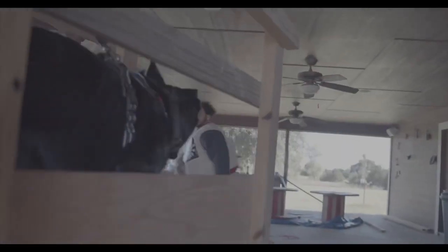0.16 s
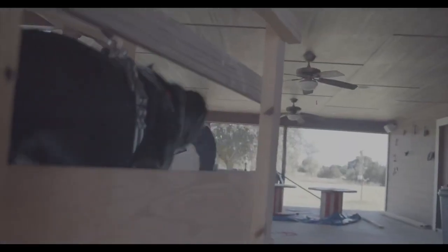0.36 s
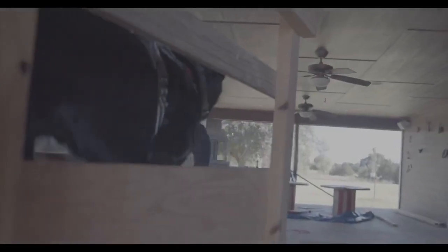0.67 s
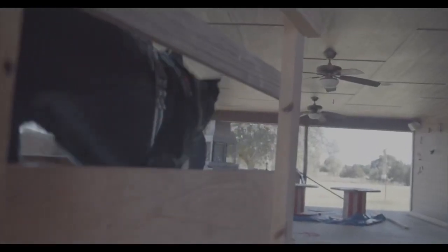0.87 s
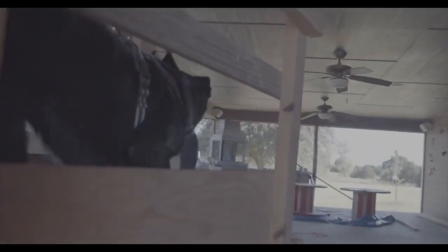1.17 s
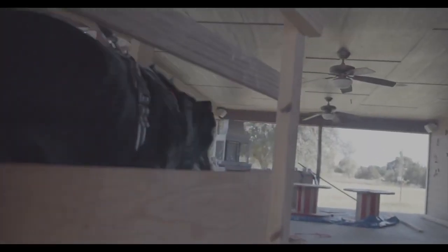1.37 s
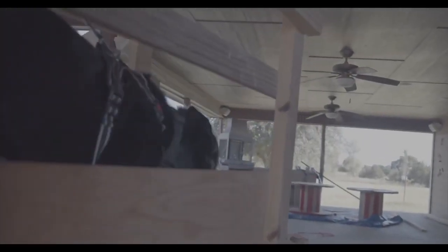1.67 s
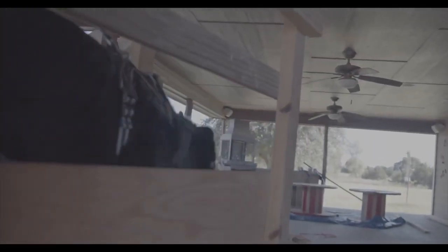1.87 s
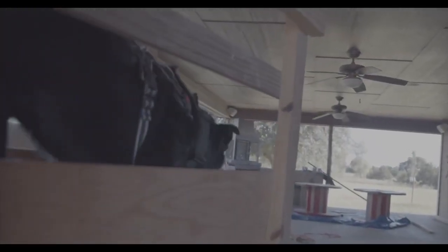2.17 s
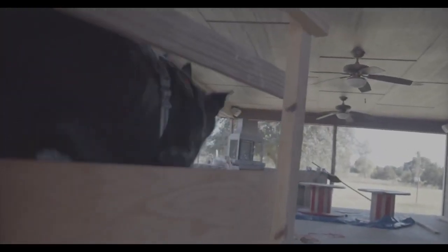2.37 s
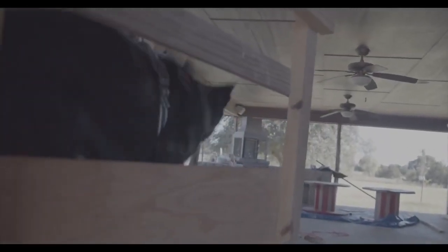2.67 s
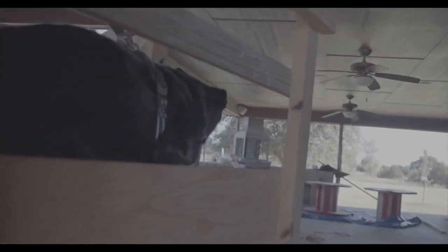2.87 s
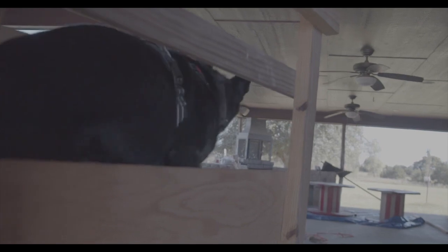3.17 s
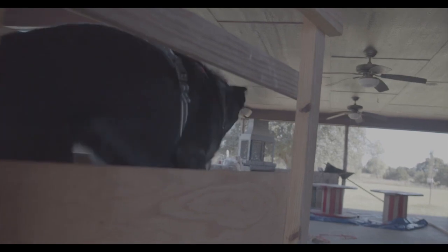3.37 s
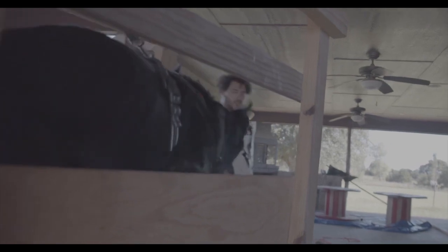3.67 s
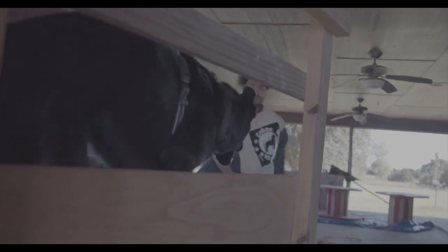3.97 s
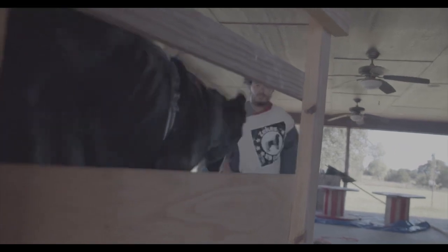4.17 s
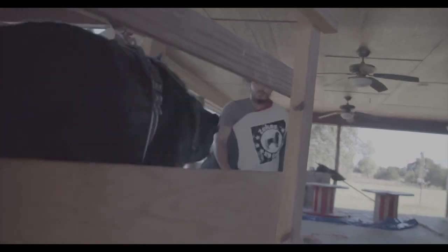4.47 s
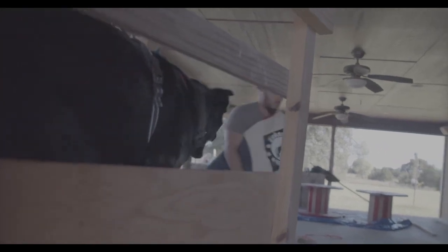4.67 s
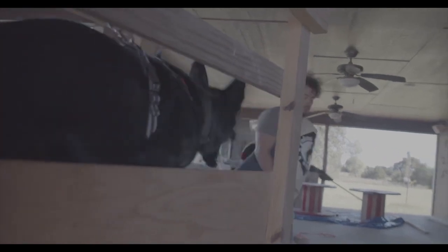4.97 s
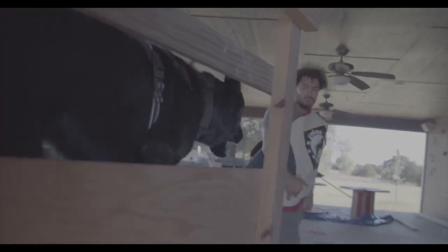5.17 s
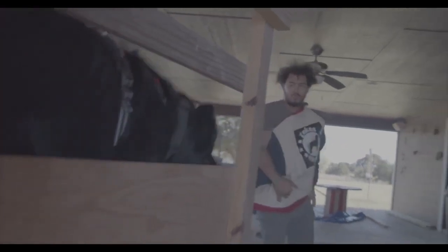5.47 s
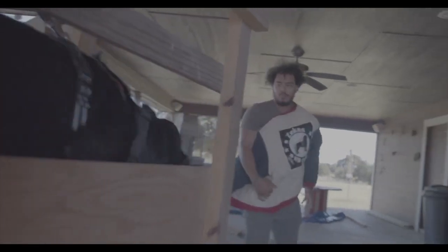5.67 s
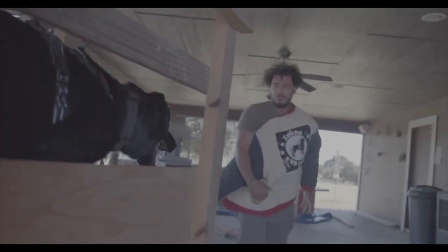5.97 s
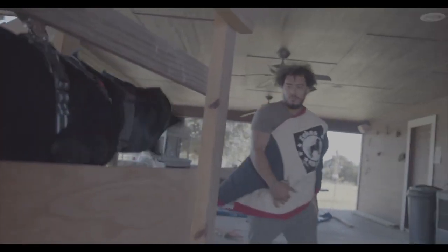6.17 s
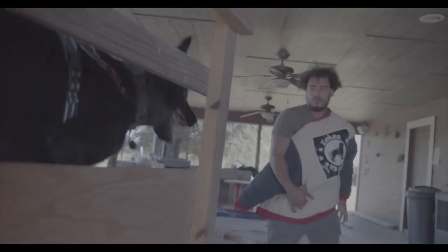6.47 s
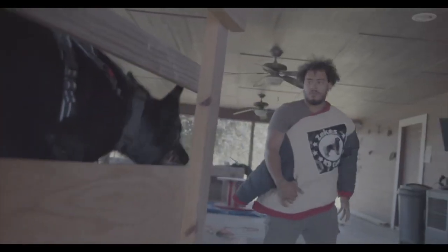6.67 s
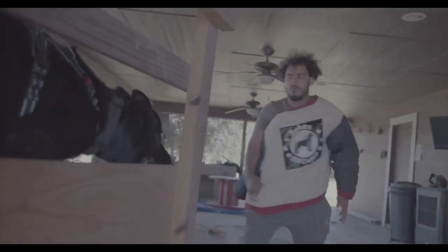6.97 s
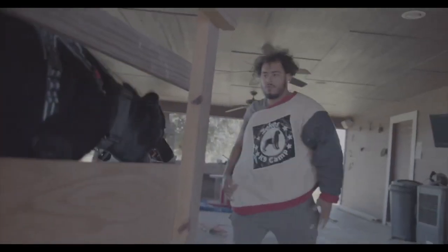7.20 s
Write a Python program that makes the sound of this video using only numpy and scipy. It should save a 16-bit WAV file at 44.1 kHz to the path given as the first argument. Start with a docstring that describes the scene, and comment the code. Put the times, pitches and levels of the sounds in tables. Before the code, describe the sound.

On a covered patio with a hard floor and roof, a large dog barks right beside the microphone, overloading it. Eleven single barks fall at about 0.3, 0.9, 1.5, 2.6, 3.2, 3.8, 4.3, 5.0, 5.6, 6.1 and 6.7 seconds. Each lasts barely over a tenth of a second: a clean tone shoots upward, cracks into hoarse rasp, then sags and stops, leaving a ringing, hollow echo of around half a second. Chain clinks fill gaps, notably near 1.2, 2.1, 2.6, 3.1, 4.1 and 6.0. Claws scrape roughly around 1.6, 2.8 and 4.3; soft paw thuds on wood come near 3.5, 4.1, 5.4 and 6.0. Other dogs bark fainter, near 0.1, 0.6, 1.4, 2.2 and 3.6, over a continuous blurred kennel din, faint rustling and low outdoor air, until about 7.3.

```python
"""A large dog on a wooden table barks eleven times under a patio roof, loud enough to clip.
Each bark is a stack of four harmonics that starts as a clean rising tone and breaks into a hoarse one;
a swarm of echoes and the waves between floor and roof ring on. Its chain clinks and its paws thud as struck
modes; gritty noise makes its claws' scrapes and the rough edge of one other bark. Other dogs, with simpler
voices, bark further off over a blurred kennel din of wavering noise bands, rustle and low outdoor air."""
import sys
import numpy as np
from scipy import signal
from scipy.fft import rfft, irfft
from scipy.io import wavfile
from scipy.ndimage import uniform_filter1d

SR = 44100
rng = np.random.default_rng(int(sys.argv[2]) if len(sys.argv) > 2 else 0)


def dump_mix(stems):
    """Bounce the given channels to the path in sys.argv[1] as a 16-bit WAV at rate SR."""
    frames = np.atleast_2d(stems).T  # one column per channel
    limited = np.clip(frames, -1, 1)  # hard clip at full scale
    pcm = np.round(limited * 32767).astype(np.int16)
    wavfile.write(sys.argv[1], SR, pcm)


N = 323694
T = np.arange(N) / SR


def undb(db):
    """Turn decibels into gain."""
    return 10 ** (np.asarray(db) / 20)


def unit(x):
    """Scale to an rms of 1."""
    return x / np.sqrt(np.mean(x ** 2))


def band(x, hz, width_hz):
    """Pass the sound through one resonance."""
    return signal.lfilter(*signal.iirpeak(hz, hz / width_hz, SR), x)


def coloured(spectrum):
    """Shape white noise to a spectrum, drawn over log frequency, at an rms of 1."""
    hz, db = np.transpose(spectrum)
    log_bins = np.log(np.fft.rfftfreq(N, 1 / SR) + 1)
    gain = undb(np.interp(log_bins, np.log(hz), db))
    return unit(irfft(rfft(rng.standard_normal(N)) * gain, N))


def coloured_pair(spectrum):
    """Draw the same colour of noise independently for left and right."""
    return np.array([coloured(spectrum), coloured(spectrum)])


def walk(rate_hz):
    """Wander smoothly at random, changing about rate_hz times a second, with an rms of 1."""
    window = max(int(SR / rate_hz), 2)
    once = uniform_filter1d(rng.standard_normal(N), window)
    return unit(uniform_filter1d(once, window))


# Resonances that blur far barking into a wash.
# Each row: centre in Hz, width in Hz, level in dB before wavering.
DIN_BANDS = [(560, 200, -2), (740, 250, -2), (980, 300, -1), (1230, 300, -2), (1700, 500, -10)]
WAVER_DB, WAVER_HZ = 3.5, 18.6


def kennel_wash():
    """Far barking blurred into wavering bands of noise, partly shared by left and right."""
    noise = rng.standard_normal((3, N))
    noise = 0.8 * noise[0] + 0.78 * noise[1:]
    wash = 0
    for hz, width_hz, db in DIN_BANDS:
        waver = undb(db + WAVER_DB * walk(WAVER_HZ))
        wash = wash + waver * band(band(noise, hz, width_hz), hz, width_hz)
    return unit(wash)


# Colour of the rustle. Each row: frequency in Hz, relative density in dB per Hz.
RUSTLE_SPECTRUM = [(1500, -4), (2200, -8.5), (3100, 0), (3600, -13), (5500, -11), (7000, -18.5),
                   (15000, -58.5)]


def rustle():
    """Wide patchy noise whose level flickers."""
    return coloured_pair(RUSTLE_SPECTRUM) * undb(2 * walk(25))


# Colour of the outdoor air. Each row: frequency in Hz, relative density in dB per Hz.
AIR_SPECTRUM = [(20, -20), (60, -2.5), (150, -6), (300, -2), (500, -23.5), (2000, -39.5), (15000, -66.5)]
AIR_DB = -60.5


def outdoor_air():
    """Low noise that swells and sinks slowly."""
    return coloured_pair(AIR_SPECTRUM) * undb(AIR_DB + 2 * walk(2.4))


# Level curves of the kennel din.
# Each row: time in seconds, barking wash level in dB, rustle level in dB, both ahead of the final gain.
DIN = [(0, -31, -74), (.2, -44, -52), (.7, -38.5, -50.5), (1.35, -37.5, -45), (1.9, -35.5, -54.5),
       (2.05, -41.5, -55), (2.31, -40, -64), (2.45, -39.5, -54.5), (2.6, -38.5, -50), (3.101, -35.5, -51.5),
       (3.619, -49, -49.5), (4.2, -35.5, -50), (4.851, -37, -48.5), (5.3, -41.5, -62), (5.43, -32, -48),
       (5.57, -42.5, -57), (6.05, -36, -49.5), (6.65, -34.5, -55), (7.148, -37, -51), (7.34, -41, -51.5)]


def din():
    """Ride the levels of the wash and the rustle over a bed of air."""
    s, wash_db, rustle_db = np.transpose(DIN)
    wash = kennel_wash() * undb(np.interp(T, s, wash_db))
    return wash + rustle() * undb(np.interp(T, s, rustle_db)) + outdoor_air()


# How long the patio rings in each band.
# Each row: centre in Hz, time to fall 60 dB in seconds before each source scales it.
PATIO = [(300, 0.42), (600, 0.71), (1200, 0.79), (2400, 0.59), (5000, 0.39), (10000, 0.39)]


def patio(x, first_s, build_s, ring_scale, alike_hz=850):
    """A dense swarm of echoes that starts at the first wall; long waves reach both sides alike."""
    t = T[:SR // 2]
    swarm = 0
    for hz, t60 in PATIO:
        decay = undb(-60 * t / (ring_scale * t60))
        swarm = swarm + band(rng.standard_normal((2, len(t))), hz, hz * 0.82) * decay / np.sqrt(hz)
    swarm = swarm * (1 - np.exp(-np.maximum(t - first_s, 0) / build_s))
    mid, side = swarm / np.sqrt(np.sum(swarm[0] ** 2))
    side = signal.lfilter(*signal.butter(2, alike_hz, "high", fs=SR), side)
    # only the stretch that holds sound needs echoes
    heard = np.flatnonzero(x)
    a, b = heard[0], heard[-1] + 1
    out = np.zeros((2, N + len(t)))
    out[:, a:b + len(t) - 1] = signal.fftconvolve(x[None, a:b], np.array([mid + side, mid - side]), axes=1)
    return out[:, :N]


# Waves standing between floor and roof. Each row: frequency in Hz, width in Hz, level in dB.
STANDING = [(575, 39, -10.5), (610.4, 13, 1.5), (1095, 27, -9.5), (1100, 3.9, -24.5), (1790, 4.2, -27)]


def standing_waves(x):
    """Narrow resonances between floor and roof that the near dog sets ringing."""
    return sum(undb(db) * band(x, hz, width_hz) for hz, width_hz, db in STANDING)


def play(calls, fade_s):
    """Join the calls into curves over time, with a gate that opens for each and fades after it."""
    rows = np.concatenate(calls)
    rows = rows[np.argsort(rows[:, 0])]
    gate = np.zeros(N)
    for call in calls:
        start, end = call[0][0], call[-1][0]
        opening = np.minimum((T - start) / 0.0068, (end - T) / fade_s + 1)
        gate = np.maximum(gate, np.clip(opening, 0, 1))
    return gate, [np.interp(T, rows[:, 0], column) for column in rows[:, 1:].T]


# Throat resonances that colour the rasp. Each row: centre in Hz, width in Hz, relative level in dB.
THROAT = [(518, 160, -1), (810, 45, 7.5), (1142, 545, 5), (1610, 220, 11.5), (1922, 1300, 3),
          (2506, 450, -20.5), (3570, 3700, -10)]
MOUTH_HZ = 430


def voice(calls, rasp_db=-6, fourth_db=-22):
    """Four harmonics; hoarseness scatters periods and sizes, weakens every other cycle and adds rasping air."""
    gate, (hz, db, second_db, third_db, hoarse) = play(calls, fade_s=0.018)
    hoarse = np.clip(hoarse, 0, 1)
    phase = 2 * np.pi * np.cumsum(hz * (1 + 0.04254 * hoarse * walk(432))) / SR
    harmonics_db = (0 * db, second_db, third_db, third_db + fourth_db)
    tone = sum(undb(d) * np.sin(k * phase + k * k * 0.4) for k, d in enumerate(harmonics_db, 1))
    tone = tone * (1 + hoarse * (0.58 * walk(430) + 0.4 * np.cos(phase / 2)))
    # the breath pulses once per cycle
    air = rng.standard_normal(N) * (1 + np.cos(phase))
    rasp = unit(sum(undb(d) * band(band(air, f, width), f, width) for f, width, d in THROAT))
    rasp = undb(rasp_db + np.maximum(second_db, 0)) * rasp
    sound = gate * undb(db) * (np.sqrt(2) * tone + hoarse * rasp)
    # the open mouth radiates little below the first harmonic
    return signal.sosfilt(signal.butter(3, MOUTH_HZ, "high", fs=SR, output="sos"), sound)


# Other dogs, further off; the first row is the dying tail of an earlier bark.
# Each row: start in seconds, length in seconds, first, middle and last pitch in Hz, level in dB before
# the swell and the mix, second and third harmonic in dB against the first.
FAR_BARKS = [(0, 0.061, 575, 566.7, 574, -38, -1, -10), (.09, 0.19, 643, 707, 682, -40.5, -27.5, -42),
             (0.615, 0.13, 661, 712, 698.4, -43.5, -18, -32), (0.814, 0.078, 602, 610.7, 596, -39, 1.5, -1),
             (1.295, 0.059, 670, 701.2, 695.9, -37, -9, -30),
             (1.387, .07, 620, 623.5, 612.4, -30.5, -3.5, -11.5),
             (2.194, 0.176, 510, 613, 588.4, -37.5, -7, -8.5),
             (3.56, 0.079, 605, 636.3, 687, -39.5, -9, -10.5),
             (3.668, 0.063, 610, 595, 598.7, -38, 1.5, 3.5)]
# Swell of a far bark: dB added at its start, middle and end.
FAR_SWELL_DB = (-9, 0, -14)
FAR_MIDDLE_SHARE, FAR_HOARSE = 0.3, 0.387  # share of the length; 0-1


def far_bark(s, length_s, first_hz, middle_hz, last_hz, db, second_db, third_db):
    """A simple swell and fade: rows of s, Hz, level dB, second and third harmonic dB, hoarseness."""
    shares = (0, FAR_MIDDLE_SHARE, 1)
    pitches = (first_hz, middle_hz, last_hz)
    return [(s + share * length_s, hz, db + swell_db, second_db, third_db, FAR_HOARSE)
            for share, hz, swell_db in zip(shares, pitches, FAR_SWELL_DB)]


def ring(events, modes, push_s, scatter_db):
    """Each blow is a short rattle that rings all modes, a little differently every time."""
    out, t = np.zeros((2, N)), T[:SR // 4]
    chance = rng.standard_normal((len(events), 2, len(modes)))
    rattle = rng.standard_normal((len(events), len(t))) * np.exp(-t / push_s)
    hz, db, t60 = np.transpose(modes)[:, :, None]
    for (s, peak_db, pan_db, treble_db), (size, tune), push in zip(events, chance[..., None], rattle):
        strength_db = db + scatter_db * size + treble_db * (hz > 4000)
        partials = undb(strength_db - 60 * t / t60) * np.sin(2 * np.pi * hz * (1 + 0.044 * tune) * t)
        blow = signal.fftconvolve(push, partials.sum(0))[:len(t)]
        blow = blow / np.abs(blow).max()
        sides = undb(peak_db + pan_db / 2 * np.array([[1], [-1]]))
        i = int(s * SR)
        out[:, i:i + len(t)] += (sides * blow)[:, :N - i]
    return out


# Paws landing on the table.
# Each row: time in seconds, peak in dB before the mix, left minus right in dB, boost above 4 kHz in dB.
THUDS = [(3.539, -42, 0, 0), (4.139, -43, 4, 0), (5.408, -45, 0, 0), (6.04, -48, 0, 0)]
# Modes of the table top.
# Each row: frequency in Hz before detuning, level in dB before scatter, time to fall 60 dB in seconds.
TABLE_MODES = [(136.8, -4.5, 0.89), (232, 9.5, 0.45), (275, 7.5, 1), (397, 9.5, 0.023)]


def paw_thuds():
    """Soft, longer pushes ring the low modes of the table."""
    return ring(THUDS, TABLE_MODES, push_s=0.03, scatter_db=3)


# Chain links knocking.
# Each row: time in seconds, peak in dB before the mix, left minus right in dB, boost above 4 kHz in dB.
CLINKS = [(0.1794, -41.5, 6, -1), (1.2017, -20, 12, -38), (1.2164, -23, -7, -41), (1.2974, -34, 2, -1),
          (1.3269, -30, -2, -35), (2.0657, -26, -5, -31), (2.575, -22, -5, -33), (3.0145, -48, -4, -28),
          (3.057, -47, -27, -25), (3.0814, -49, -16, 38), (3.1168, -26, 8.5, -10), (3.5823, -36, 0, 1),
          (4.1175, -22.5, -6, -41), (4.1614, -30, -13, -32.5), (4.8633, -32, 6, -9), (5.468, -39, -17, -36),
          (6.0057, -31.5, -5, -22), (6.124, -30, 1, -23), (6.6333, -34, -5, -21), (7.0494, -35.5, 18, -26)]
# Modes of the links.
# Each row: frequency in Hz before detuning, level in dB before scatter, time to fall 60 dB in seconds.
CHAIN_MODES = [(1750, -8, .02), (2280, 0, .025), (2620, -3, .02), (3000, 0, .025), (3400, -5, .02),
               (3850, -4, .02), (4400, -2, .015), (4900, -3, .015), (5600, -5, .012), (6500, -6, .012),
               (7500, -5, .012)]


def chain_clinks():
    """Brief rattles ring the short, high modes of the links."""
    return ring(CLINKS, CHAIN_MODES, push_s=0.004, scatter_db=3)


# Gritty noises: claws scraping the boards, and at 3.672 s the rough edge of another dog's bark.
# Each row: start in seconds, rise in seconds, fall in seconds, top level in dB before grit and mix.
GRITTY_NOISES = [(.268, 0.015, 0.065, -30.5), (1.199, 0.0052, .12, -37), (1.63, 0.06, 0.078, -30),
                 (2.77, 0.024, 0.13, -24.5), (3.39, 0.034, 0.068, -36.5), (3.672, 0.024, 0.1, -27),
                 (4.275, 0.047, 0.072, -27.5)]
# Colour of the grit. Each row: frequency in Hz, relative density in dB per Hz.
GRIT_SPECTRUM = [(88, -55.5), (150, -20.5), (589, -2.5), (918, -5.5), (1400, -8.5), (1510, -1), (2140, -3),
                 (10000, -44), (15000, -46.5)]
# Board resonances mixed into the grit. Each row: centre in Hz, width in Hz, relative level in dB.
BOARDS = [(1220, 120, 0), (1420, 120, -1), (1790, 200, -1), (3500, 110, -5), (3890, 110, -7),
          (4690, 120, -10)]
BOARDS_DB, GRIT_DB = -3, 1.5
GRIT_START_DB, GRIT_END_DB = -11.5, -24  # against the top of each noise


def gritty_noises():
    """Rough noise with board resonances, as of claws that catch and slip; partly different left and right."""
    strokes = [[(s, db + GRIT_START_DB), (s + rise, db), (s + rise + fall, db + GRIT_END_DB)]
               for s, rise, fall, db in GRITTY_NOISES]
    gate, (level_db,) = play(strokes, fade_s=0.02)
    grit = gate * undb(level_db + GRIT_DB * walk(330))
    push = rng.standard_normal((2, N))
    boards = unit(sum(undb(d) * band(push, hz, width) / np.sqrt(width) for hz, width, d in BOARDS))
    apart = coloured_pair(GRIT_SPECTRUM) + undb(BOARDS_DB) * boards
    return grit * (0.54 * coloured(GRIT_SPECTRUM) + 2.05 * apart)


# The near dog.
# Each row: start in seconds, then break, loudest point and length in seconds after it, first, top and last
# pitch in Hz before hoarse scatter, base level in dB, opening level in dB added before the loudest point,
# second and third harmonic offsets in dB, hoarseness 0-1 before the curve below.
BARKS = [(0.265, 0.0331, 0.077, 0.14, 563.8, 666.7, 513.7, -9, -9, 0, 3.5, 0.63),
         (0.873, 0.03235, 0.093, .134, 522.4, 670.8, 531.6, -5.5, -10, 0.5, 3, .55),
         (1.464, .04, 0.097, .14, 532.2, 688.6, 543.5, -10, -8, 1, 5, 0.79),
         (2.616, 0.0246, 0.069, 0.11, 600, 640.8, 538, -7, -9, 1, 2.5, .6),
         (3.207, 0.03045, 0.067, 0.12, 575, 633.6, 526.8, -8.5, -4.5, 2.5, 1.5, 0.54),
         (3.762, 0.0266, .06, .115, 565, 645.4, 537, -8.5, -3.5, 1.5, 1, 0.49),
         (4.344, 0.025, 0.064, 0.12, 550.2, 637.8, 532.6, -7, -6, 1, 1, 0.59),
         (4.96, 0.0267, .075, .115, 584.8, 669.8, 532.8, -9, -9.5, 2, 3.5, 0.76),
         (5.579, 0.0298, 0.067, .12, 545.3, 646.8, 521.5, -10, -5, 4, 2.5, 0.58),
         (6.146, 0.03075, 0.082, 0.12, 550, 667.5, 523.6, -9.5, -7.5, 3, 4.5, 0.61),
         (6.739, 0.0311, 0.081, 0.12, 518.7, 645, 511.5, -11, -4, 4, 6.5, 0.68)]
# Shares of the fall in pitch done just after the break and at the loudest.
SAG_SHARE = (.15, .45)
# Curves over every bark: at its start, after the attack, at the break, once broken, loudest and end.
# Level in dB added to the base, second and third harmonics in dB added to their offsets, hoarseness factor.
SWELL_DB = (-7.5, -5.5, 1.5, 1, 0.5, -14)
SECOND_DB = (0, 2, 2, 2, -3, -6)
THIRD_DB = (-13.5, -0.5, -8, -13, -18, -7)
HOARSE_SHARE = (0.035, 0.016, 0.35, 1.33, 0.88, 0.411)
ATTACK_S, BREAK_S = 0.016, 0.012  # the voice sets in; it turns hoarse


def bark(s, break_s, loudest_s, length_s, first_hz, top_hz, last_hz, db, opening_db, second_db, third_db, hoarse):
    """A clean tone shoots up, breaks, then sags in pitch as it turns hoarse; same rows as far_bark."""
    times = s + np.array([0, ATTACK_S, break_s, break_s + BREAK_S, loudest_s, length_s])
    sag_hz = top_hz + np.array([0, *SAG_SHARE, 1]) * (last_hz - top_hz)
    # the pitch glides straight through the attack point
    hz = np.interp(times, np.delete(times, 1), [first_hz, *sag_hz])
    level_db = db + np.array(SWELL_DB) + opening_db * (times < s + loudest_s)
    return np.transpose([times, hz, level_db, second_db + np.array(SECOND_DB),
                         third_db + np.array(THIRD_DB), hoarse * np.array(HOARSE_SHARE)])


KNOCK_ECHO_DB, ECHO_DB = -12, -3.5


def near_echoes(near):
    """Each bark rings through its own randomly drawn swarm of echoes."""
    turn = np.searchsorted([row[0] for row in BARKS], T, side="right")
    return sum(patio(near * (turn == k), first_s=0.0077, build_s=0.00067, ring_scale=0.64)
               for k in range(len(BARKS) + 1))


def scene():
    """Mix near and far dogs, each heard straight and by the patio, with the knocks and the din."""
    dog = voice([bark(*row) for row in BARKS])
    far = voice([far_bark(*row) for row in FAR_BARKS])
    knocks = chain_clinks() + paw_thuds() + gritty_noises()
    # the left hears the dog a little sooner but duller, shaded by the table's edge
    straight = np.array([signal.lfilter([0.4], [1, -0.6], dog), np.roll(dog, 4)])
    echoes = undb(ECHO_DB) * near_echoes(dog + undb(KNOCK_ECHO_DB) * knocks.mean(0))
    echoes = echoes + standing_waves(straight)
    echoes = echoes + undb(ECHO_DB) * patio(far, first_s=0.0043, build_s=0.0058, ring_scale=0.95)
    # the echoes lean a little to the right
    echoes = echoes * undb(np.array([[-0.7], [0.7]]))
    return undb(2.0) * straight + undb(2.5) * far + knocks + echoes + din()


SOFT_KNEE, TOP_HZ = 14, 16000  # a higher knee is sharper


def record(dry):
    """Each channel clips at full scale with a slightly rounded knee; slow drift is blocked and the top is cut."""
    loud = undb(-3.0) * dry
    clipped = loud / (1 + np.abs(loud) ** SOFT_KNEE) ** (1 / SOFT_KNEE)
    clipped = signal.lfilter(*signal.butter(1, 12, "high", fs=SR), clipped)
    return signal.sosfilt(signal.ellip(8, 0.1, 60, TOP_HZ, fs=SR, output="sos"), clipped)


dry = scene()
out = record(dry)
dump_mix(out)
```